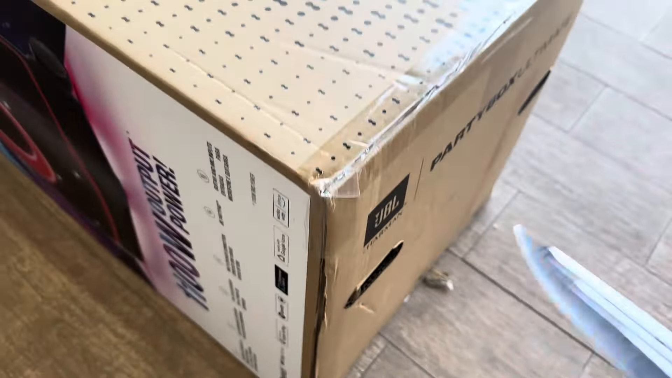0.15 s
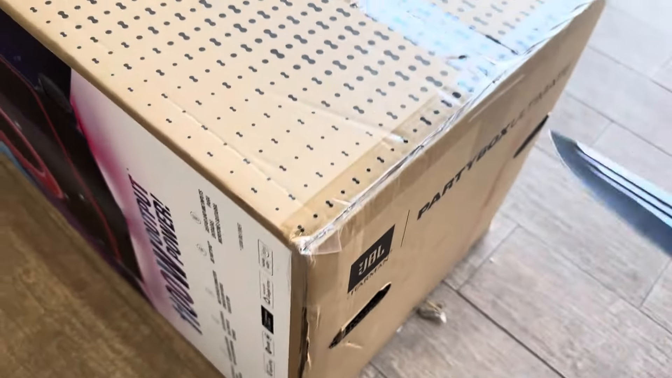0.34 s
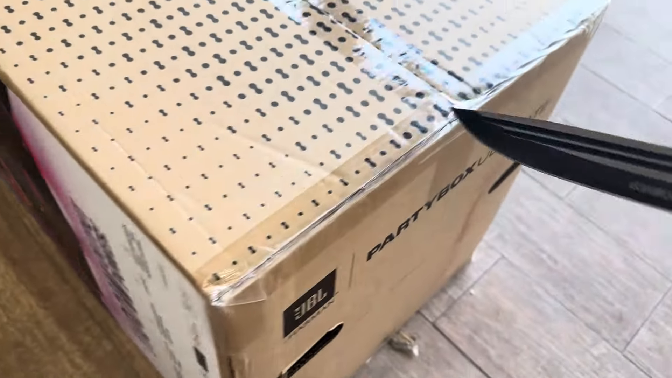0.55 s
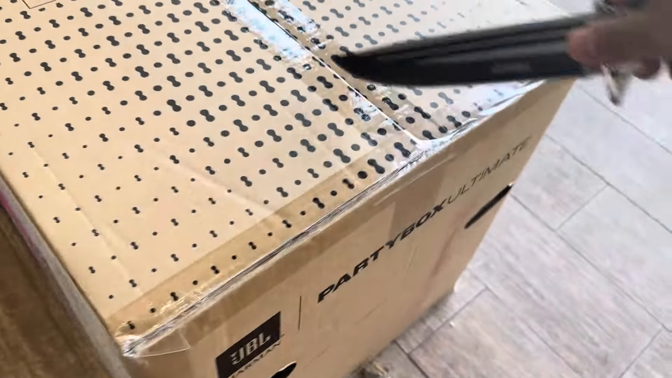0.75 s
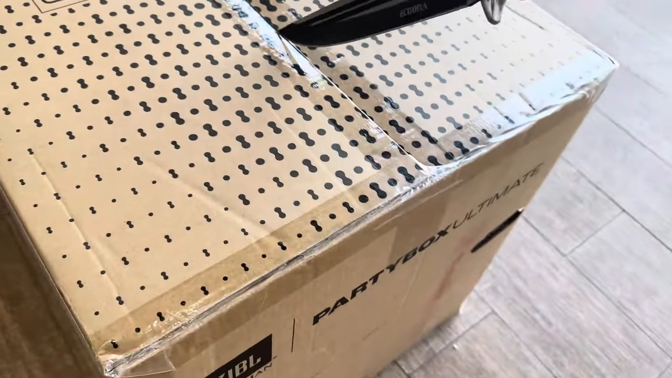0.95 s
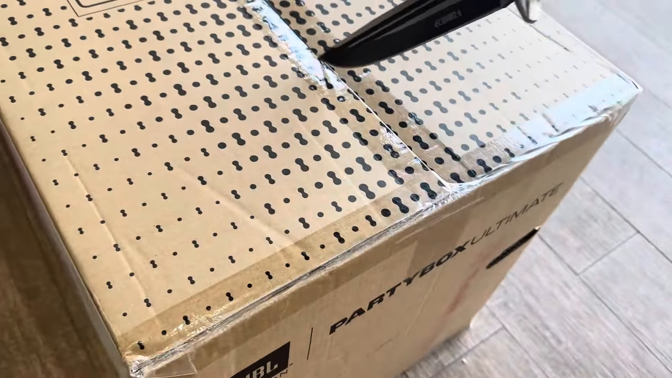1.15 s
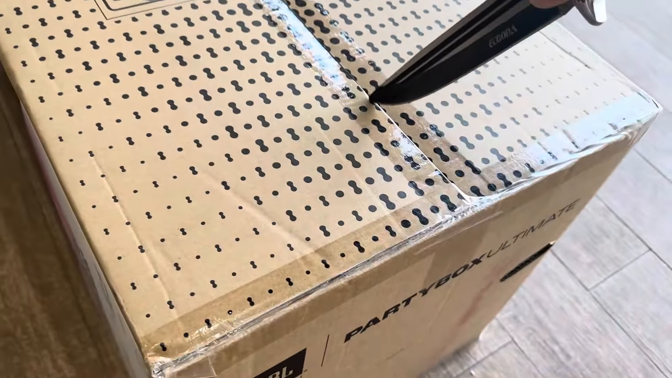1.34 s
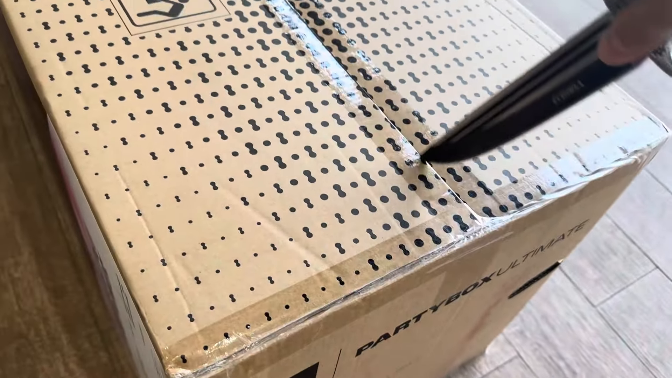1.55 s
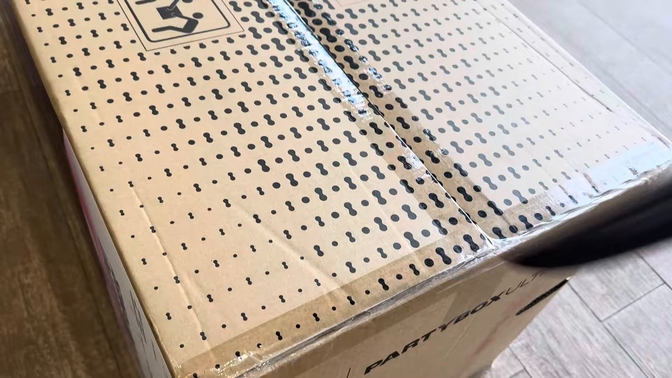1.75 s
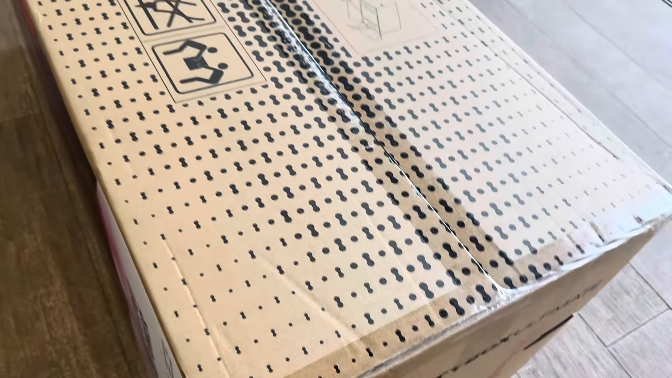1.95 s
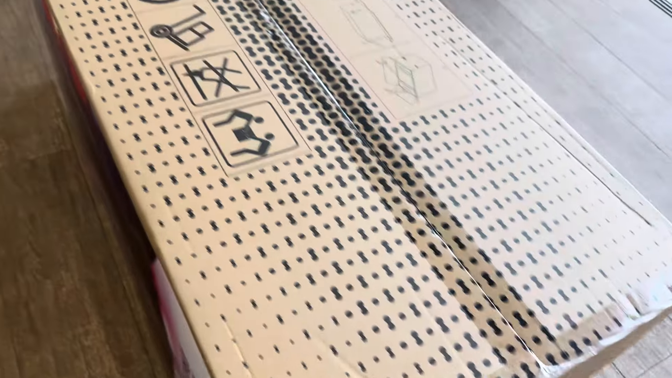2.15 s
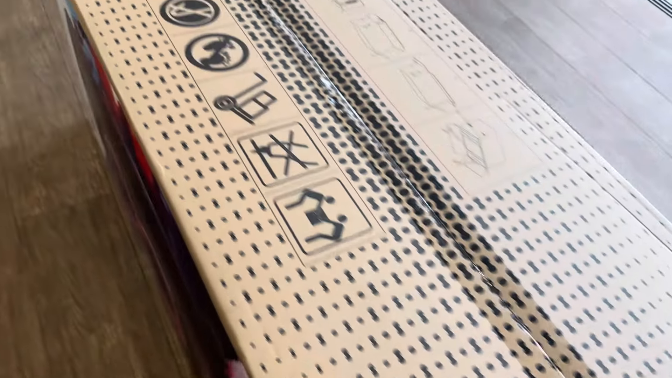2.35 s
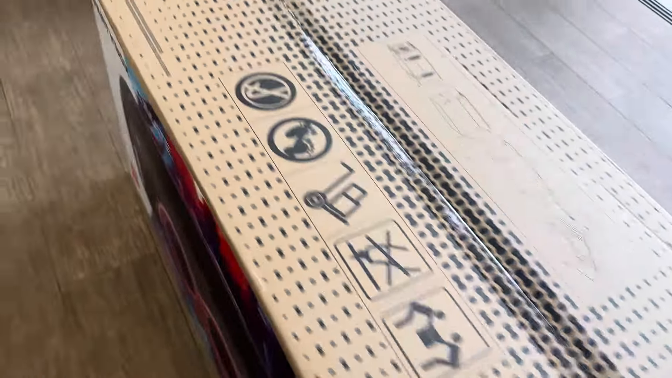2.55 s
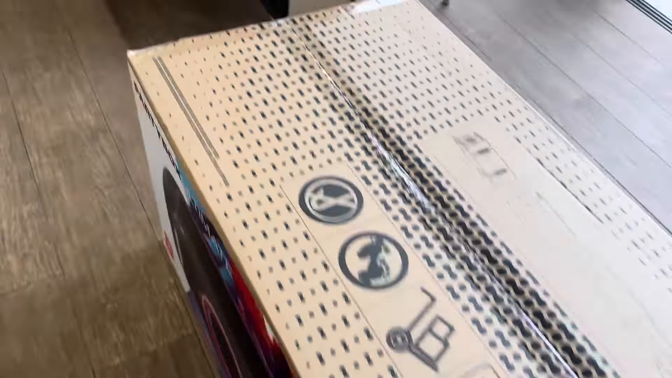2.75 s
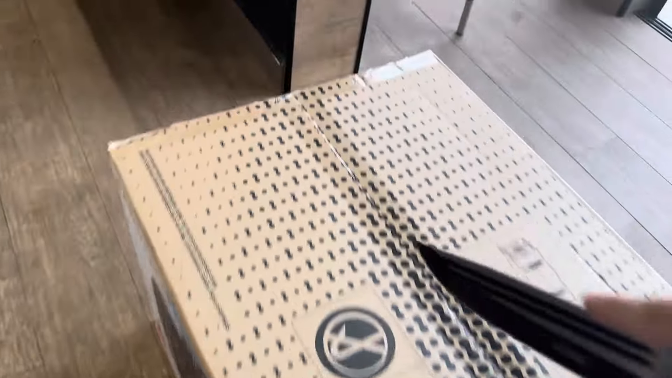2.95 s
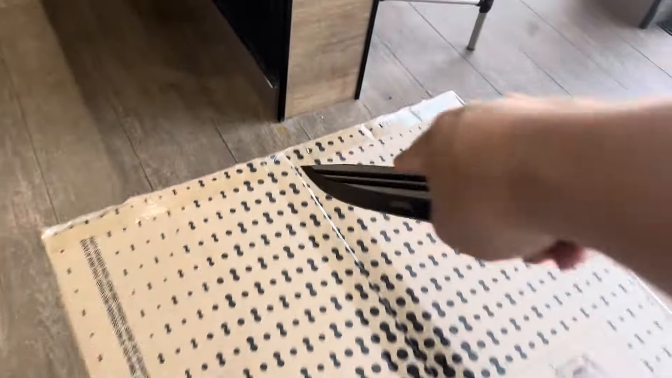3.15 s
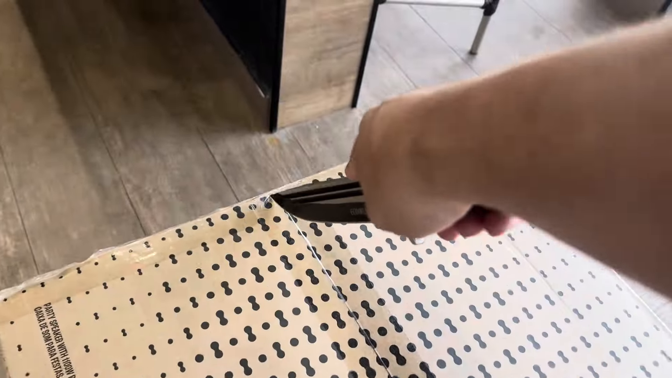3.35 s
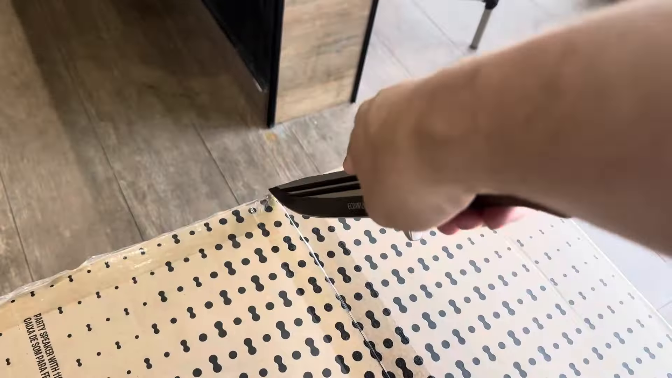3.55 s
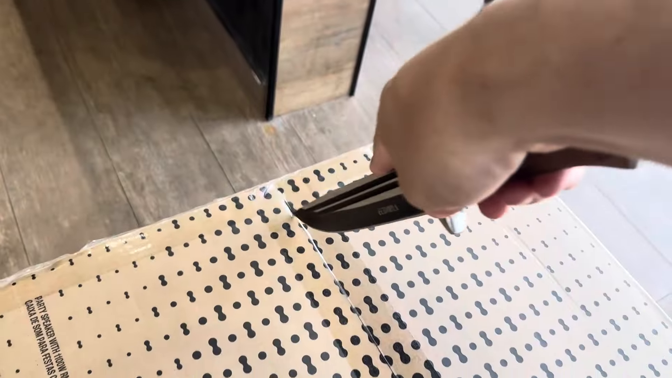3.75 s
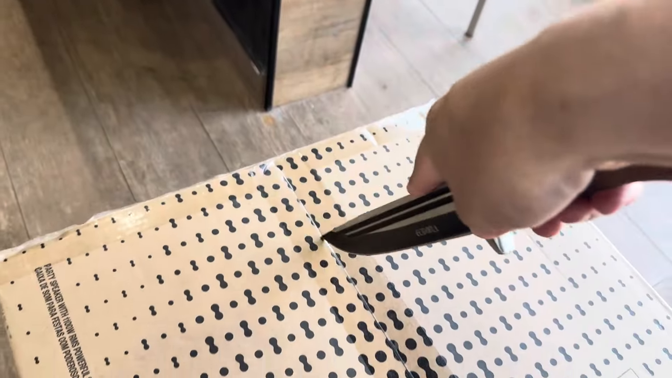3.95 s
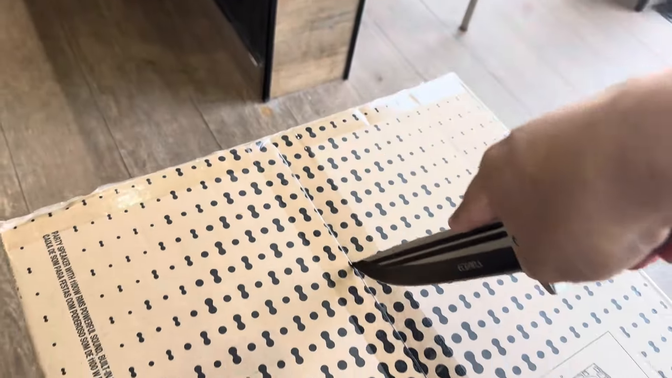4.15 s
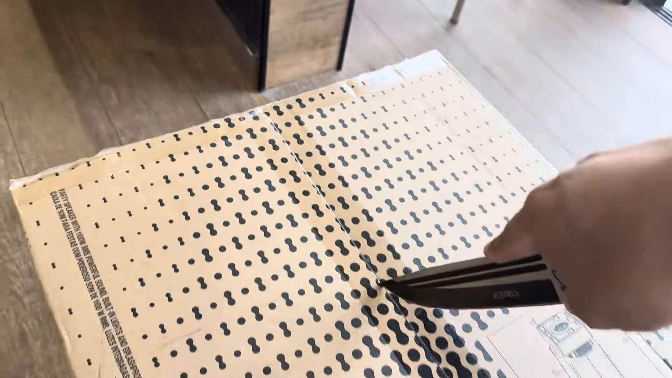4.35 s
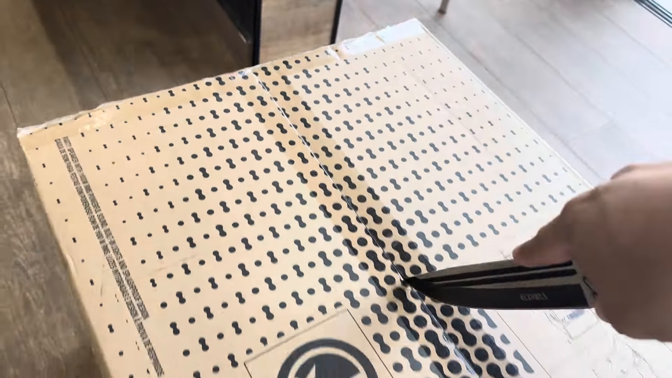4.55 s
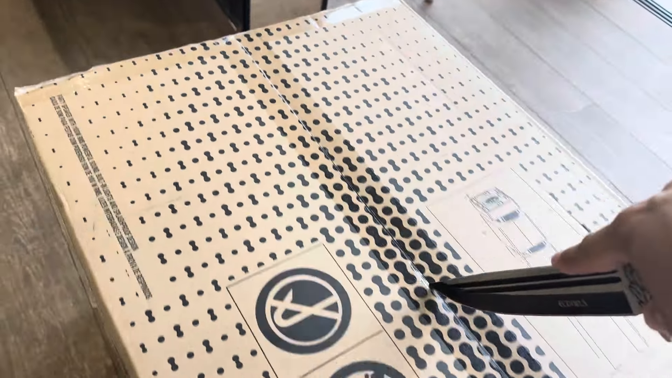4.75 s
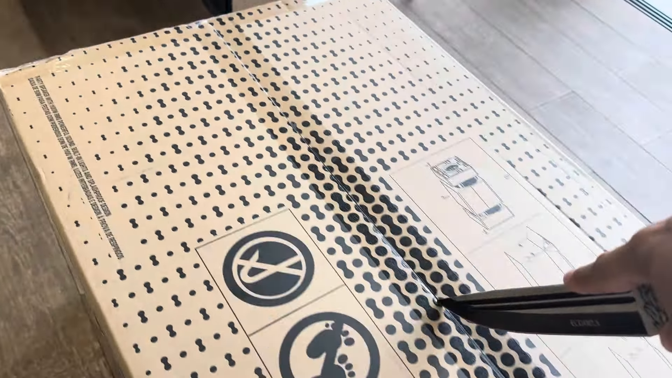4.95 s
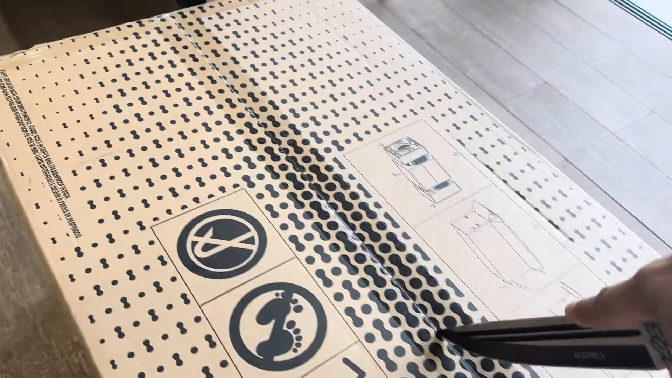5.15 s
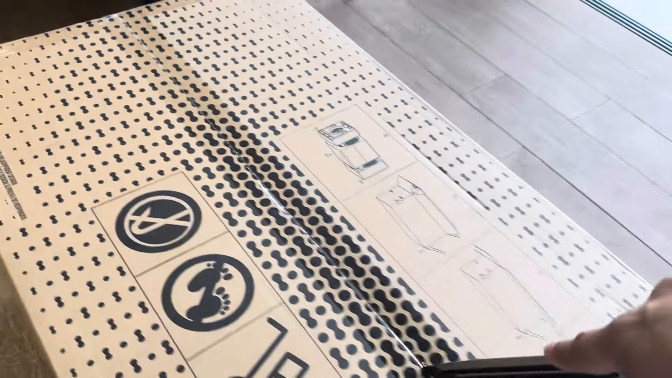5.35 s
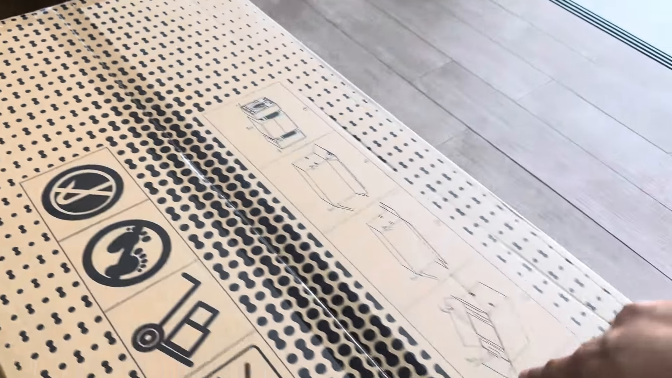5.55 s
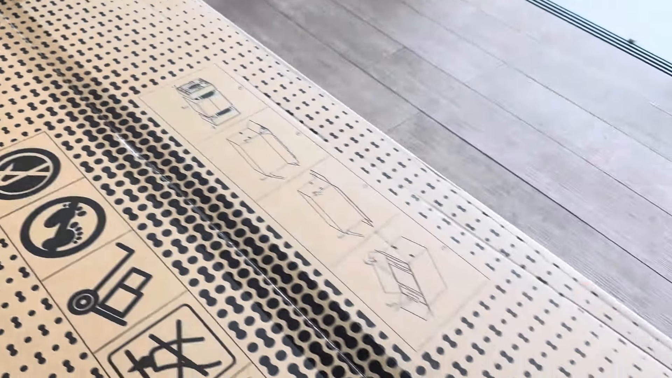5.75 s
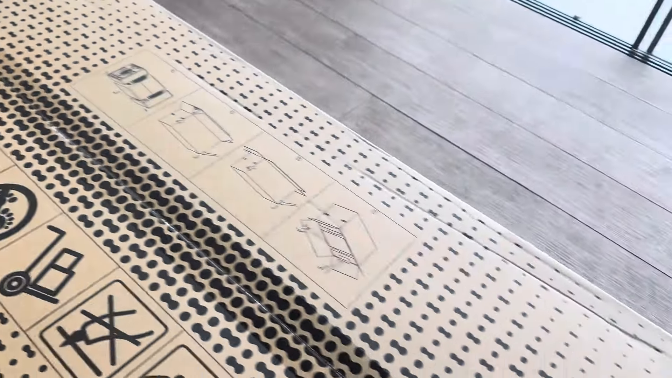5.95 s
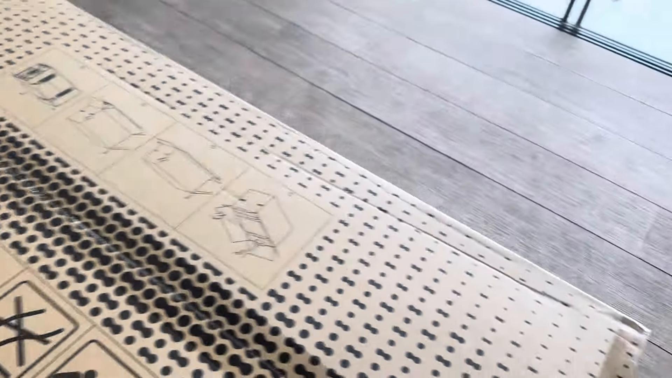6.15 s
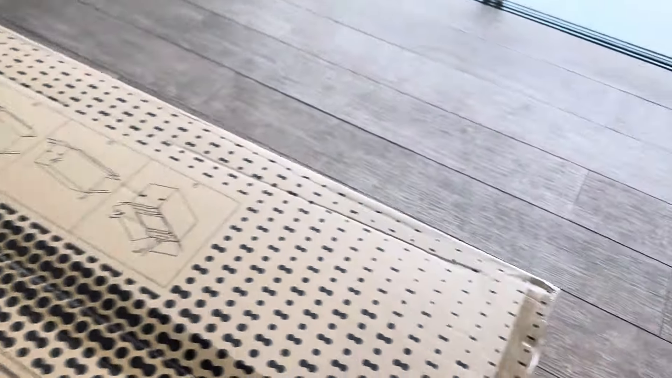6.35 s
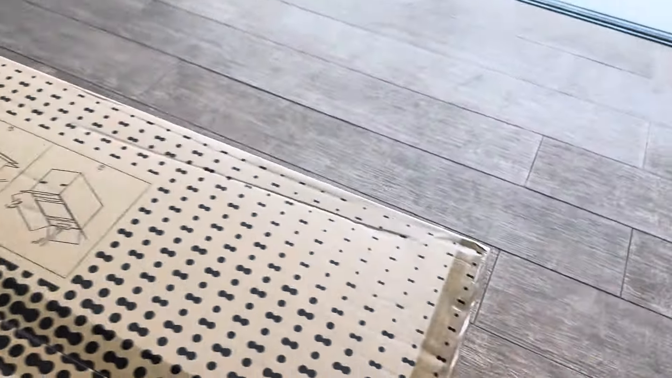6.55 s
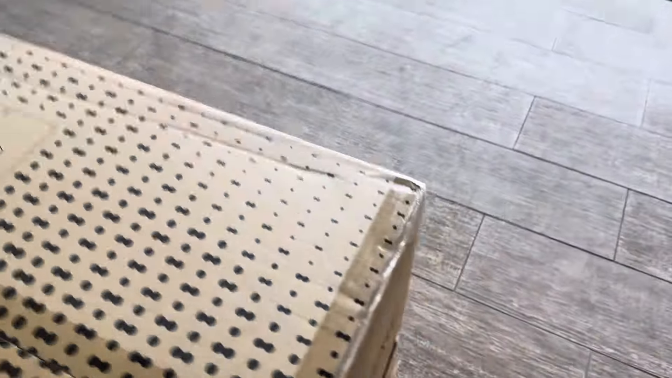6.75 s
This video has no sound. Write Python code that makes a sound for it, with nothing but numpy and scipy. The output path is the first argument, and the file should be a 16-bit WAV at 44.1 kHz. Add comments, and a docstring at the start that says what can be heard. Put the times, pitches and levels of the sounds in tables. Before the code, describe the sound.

A blade punches through packing tape on a big full carton with a sharp snap, then slits the seam in a long rumbling scrape ending in loud thumps.

```python
"""A knife slits the packing tape along the top seam of a large, full carton: a short cut, then a long one.
Fine noise grains hiss as the tape, coarser ones rub as the flaps, and others ring the panel modes as a rumble.
Pushes ring the same modes as thuds; noise bursts snap and tick, sliding tones squeal, a low mode booms.
A room of decaying noise answers the box; a sine hums and coloured noise rustles faintly as air."""
import sys
import numpy as np
from scipy import signal
from scipy.fft import rfft, irfft, next_fast_len
from scipy.io import wavfile
from scipy.ndimage import uniform_filter1d, map_coordinates

SR = 44100
rng = np.random.default_rng(int(sys.argv[2]) if len(sys.argv) > 2 else 0)


def materialize(psi):
    """Save the field psi as 16-bit PCM at rate SR to the path in sys.argv[1].

    A 1-D psi becomes a single channel; in a 2-D psi each row is a channel.
    """
    bounded = np.clip(np.atleast_2d(psi).T, -1, 1)
    quanta = np.round(bounded * 32767).astype(np.int16)
    wavfile.write(sys.argv[1], SR, quanta)


N = 300321


def amp(db):
    """dB to gain."""
    return 10 ** (np.asarray(db) / 20)


def rms_one(x):
    """Scale to rms 1."""
    return x / np.sqrt(np.mean(x ** 2) + 1e-20)


def in_time(rows):
    """Interpolate each column after the first (seconds) to one value per sample."""
    s, *columns = np.transpose(rows)
    return [np.interp(np.arange(N) / SR, s, column) for column in columns]


def at_hz(points, hz):
    """Read a spectrum on a log-frequency axis."""
    points = np.array(points)
    return np.interp(np.log(hz), np.log(points[:, 0]), points[:, 1])


def coloured(x, points):
    """Filter x by a spectrum in dB, rms 1."""
    size = next_fast_len(N)
    hz = np.arange(1, size // 2 + 2) * SR / size
    filtered = irfft(rfft(x, size) * amp(at_hz(points, hz)), size)
    return rms_one(filtered[..., :N])


def drift(rate):
    """Slow smooth wander: random knots of spread 1, two per period of the rate in Hz."""
    knots = rng.standard_normal(int(N / SR * rate * 2) + 3)
    return map_coordinates(knots, [np.arange(N) / SR * rate * 2], order=3)


def grains(per_s, spread_db):
    """Two unrelated streams (mid, side) of tiny slips of uneven size and random sign."""
    sizes = amp(spread_db * np.minimum(rng.exponential(1, (2, N)), 5))
    signs = rng.choice([-1, 1], (2, N))
    return sizes * signs * (rng.random((2, N)) < per_s / SR)


def ring(x, hz, t60_s):
    """Two-pole resonator: a unit click sets a decaying sine ringing."""
    r = amp(-60 / (t60_s * SR))
    w = 2 * np.pi * hz / SR
    return signal.lfilter([0, np.sin(w)], [1, -2 * r * np.cos(w), r * r], x + 1e-18)


def resonate(x, peaks):
    """Sum broad resonances (Hz, width in Hz, dB), each coming and going on its own."""
    out = 0
    for hz, width_hz, db in peaks:
        t60_s = np.log(1000) / (np.pi * width_hz)
        out = out + amp(db + 2.5 * drift(14.0)) * rms_one(ring(x, hz, t60_s))
    return out


def band(x, low_hz, high_hz):
    """Band-pass."""
    return signal.sosfilt(signal.butter(2, [low_hz, high_hz], "band", fs=SR, output="sos"), x)


def near(hz, centre_hz, octaves):
    """Gaussian weight on the octave axis: modes close to the driven pitch answer most."""
    return np.exp(-.5 * (np.log2(hz / centre_hz) / octaves) ** 2)


def swell(t, s, swell_s, hold_s, fade_s):
    """Power of an event: exponential rise until s, hold, then fall; swell_s and fade_s are per 20 dB."""
    before = (s - t) / swell_s
    after = (t - s - hold_s) / fade_s
    return amp(-40 * np.maximum(0, np.maximum(before, after)))


# Spectrum of the air. Each row: frequency in Hz, relative density in dB per Hz.
AIR_SPECTRUM = [(56, -39), (95, -19.5), (108, -9), (306, -1), (477, -16), (832, -14), (1080, -16.5),
                (1180, -15), (1720, -22), (6060, -35), (8000, -39), (10400, -91), (17600, -120)]


def air():
    """Faint moving air: coloured noise, gently patchy."""
    level_db = -52 + .9 * drift(6.0)
    return amp(level_db) * coloured(rng.standard_normal((2, N)), AIR_SPECTRUM)


# Level of the hum over time, nearly gone under the strong boom. Each row: time in seconds, mean rms in dB.
HUM_LEVEL = [(0, -46.5), (.8, -46), (1.2, -44.5), (1.9, -46), (2.6, -42.5), (3.3, -40), (4.05, -37.5),
             (4.2, -50), (4.3, -58), (5.0, -38), (5.9, -43), (6.2, -41.5), (6.81, -44.5)]
HUM_HZ = 58.4


def hum():
    """Low motor hum of an appliance: one steady sine, wandering in level, weaker in the side signal."""
    level_db, = in_time(HUM_LEVEL)
    sine = np.sin(2 * np.pi * HUM_HZ * np.arange(N) / SR)
    return np.sqrt(2) * amp(level_db + 1.1 * drift(3.6)) * sine * [[1], [.5]]


# Decay of the hard-floored room. Each row: frequency in Hz, T60 in seconds, relative level in dB.
ROOM_DECAY = [(101, 0.54, -0.5), (398, 0.5, 0.5), (1467, 0.83, -1.5), (5330, 0.59, -1),
              (11860, 0.091, -22.5)]


def room(x):
    """Diffuse tail: octaves of noise, each dying at its own rate, convolved with the mid signal."""
    t = np.arange(int(.8 * SR)) / SR
    decay = np.array(ROOM_DECAY)
    onset = np.clip(t / 0.0015, 0, 1)
    tail = np.zeros((2, len(t)))
    for hz in 60 * 2. ** np.arange(8):
        centre_hz = np.sqrt(2) * hz
        t60_s = at_hz(decay[:, [0, 1]], centre_hz)
        level_db = at_hz(decay[:, [0, 2]], centre_hz)
        noise = band(rng.standard_normal((2, len(t))), hz, 2 * hz)
        tail += amp(level_db - 60 * t / t60_s) * noise * onset
    tail /= np.sqrt(np.sum(tail[0] ** 2))
    return signal.fftconvolve(x[:1], tail, axes=1)[:, :N]


# Booms where the blade judders. Each row: time when full level is reached in seconds, hold in seconds,
# mean pitch in Hz, level in dB.
JUDDER_BOOMS = [(4.39, 0.11, 58.5, -29), (4.62, 0.061, 60.63, -39), (4.947, 0.032, 60.87, -38),
                (5.193, 0.02, 64.87, -37), (5.395, 0.041, 62.04, -55), (5.744, .02, 60.7, -35)]
BOOM_SWELL_S, BOOM_FADE_S = 0.15, 0.28   # per 20 dB


def boom():
    """The box in its lowest mode: an oscillation uneven in pitch and level, peaked by its octave."""
    t = np.arange(N) / SR
    s, hold_s, hz, _ = np.transpose(JUDDER_BOOMS)
    power = 0
    for full_s, held_s, _, db in JUDDER_BOOMS:
        power = power + amp(2 * db) * swell(t, full_s, BOOM_SWELL_S, held_s, BOOM_FADE_S)
    pitch_hz = np.interp(t, s + hold_s / 2, hz) * (1 + 0.0203 * drift(7.7))
    phase = 2 * np.pi * np.cumsum(pitch_hz) / SR
    wave = np.cos(phase) + 0.088 * np.cos(2 * phase)
    return np.sqrt(2 * power) * amp(0.44 * drift(36.0)) * wave * [[1], [.5]]


# Modes of the carton's panels and air. Each row: pitch in Hz, relative level in dB,
# T60 in seconds before the shortening in thuds() and rumble().
CARTON_MODES = [(64.4, -4, 0.12), (79.3, -8, 0.07), (90, -6.5, .06), (103, -1.5, 0.09), (117, -5.5, 0.042),
                (150.5, 0, 0.065), (180, -1.5, 0.057), (219, -4.5, 0.042), (253.4, -0.5, 0.064),
                (296, -1.5, 0.08), (349.5, -1, 0.064), (393, -5, 0.0914), (453, -16.5, 0.0755),
                (481.4, -3, 0.11), (567, -18.5, 0.034), (622, 1, 0.074), (806, -11, 0.017)]
# Blows on the carton. Each row: start in seconds, thud peak in dB, thud pitch in Hz, reach over the modes
# in octaves, knock level in dB, after-rumble in dB, flap rattle in dB before the drag trim in rub().
BLOWS = [(0.855, -24, 120, .9, -34, -29, -45.5), (0.886, -26, 71, 0.73, -51, -47, -64),
         (1.253, -12.5, 262, 1.4, -23, -25, -27.5), (1.7, -11, 93.4, 0.46, -35, -27.5, -49),
         (1.74, -31, 85, 0.67, -54.5, -39, -57), (1.773, -34, 95, 0.65, -55, -44, -55),
         (1.811, -32, 75, .74, -61, -47, -62), (2.945, -49, 201, 0.93, -41, -47, -44),
         (3.324, -42, 299, 0.68, -45, -42.5, -45), (3.707, -29.5, 220, 0.89, -48, -46.5, -40),
         (3.728, -26.5, 290, 0.089, -58, -51.5, -60), (3.78, -21, 305, 0.18, -60, -47.5, -64),
         (3.846, -34, 290, 0.12, -58, -53, -60), (3.893, -30, 287, .1, -62, -50, -60),
         (3.934, -31, 292, 0.066, -50, -46, -60), (3.999, -28, 150, 0.098, -51, -51, -58),
         (4.103, -29, 152, 0.17, -57, -47, -47), (4.195, -29, 140, 0.2, -56, -46, -54),
         (4.279, -24.5, 128, 0.57, -49, -44, -57), (4.394, -31, 110, 0.74, -60, -31, -42),
         (4.489, -26, 145, 0.35, -59, -42, -57), (4.53, -36, 102, 0.51, -47, -47.5, -42.5),
         (4.585, -19, 140, 0.51, -54, -44, -60), (4.633, -34, 100, 0.71, -44, -30, -56),
         (4.678, -16.5, 151, 0.21, -53, -30, -60), (5.006, -27, 298, .2, -46, -55, -58),
         (5.103, -27, 105, 0.37, -50, -48, -55), (5.182, -24, 300, 0.33, -46, -42, -57),
         (5.282, -23, 130, 0.61, -40, -48, -52), (5.398, -26, 385, 0.084, -38, -46, -56),
         (5.457, -25, 129, 0.66, -36, -50, -59), (5.591, -28, 255, 0.13, -38, -42, -48),
         (5.749, -18, 220, 0.65, -48, -41, -48), (5.819, -21, 296, 0.094, -46, -29.5, -40),
         (5.868, -11, 282, 0.32, -40, -25, -23), (5.955, -22, 295, 0.23, -42, -35, -35),
         (5.979, -9, 167.4, 0.34, -36, -41.5, -48)]
CONTACT_CYCLES = 0.4   # length of the push, in cycles of the thud pitch


def thuds():
    """A soft push rings the carton modes near its pitch; a dull burst of noise is the knock."""
    out = np.zeros((2, N))
    strengths = amp(3.0 * rng.standard_normal((len(BLOWS), 2, len(CARTON_MODES))))
    t = np.arange(int(.3 * SR)) / SR
    knock_shape = np.clip(t / 0.0011, 0, 1) * amp(-60 * t / 0.018)
    for (s, thud_db, thud_hz, reach, knock_db, *_), strength in zip(BLOWS, strengths):
        body = 0
        for k, (hz, db, t60_s) in enumerate(CARTON_MODES):
            delay_s = 0.043 / np.sqrt(hz)   # bending waves: the lows travel slower and come later
            progress = (t - delay_s) * thud_hz / CONTACT_CYCLES
            push = np.sin(np.pi * np.clip(progress, 0, 1)) ** 2
            gain = amp(db) * near(hz, thud_hz, reach) * strength[:, [k]]
            body = body + gain * ring(push, hz, 0.72 * t60_s)
        body = body / np.abs(body).max(axis=1, keepdims=True)
        noise = rng.standard_normal((2, len(t)))
        knock = rms_one(band(band(noise, 350, 1800), 350, 1800)) * knock_shape
        at = round(s * SR)
        out[:, at:at + len(t)] += amp(thud_db) * body + amp(knock_db) * knock
    return out


# Snaps of tape and ticks of the blade. Each row: start in seconds, crack peak in dB, crack pitch in Hz,
# edge peak in dB, bright snap peak in dB.
SNAPS = [(0.1694, -58, 915, -54, -73), (0.1999, -41.5, 1130, -48.5, -81), (0.5734, -62, 1230, -56, -55),
         (0.8555, -43, 700, -42, -42), (1.073, -57, 1060, -49, -65.5), (1.119, -62, 1180, -74, -52.5),
         (1.253, -14, 2110, -20, -8.5), (1.2535, -19, 806, -36, -25), (1.279, -36, 2000, -36, -50),
         (1.638, -40, 895, -41, -32), (1.6425, -26, 2050, -33, -38), (1.687, -31, 1250, -36, -39),
         (1.6925, -22, 1330, -21, -25), (1.696, -21, 1650, -37, -37), (1.9297, -47, 1660, -53, -51),
         (2.029, -56, 937, -52, -59), (2.2364, -35.5, 1240, -37.5, -29), (2.9436, -36.5, 1100, -43, -70),
         (2.959, -34.5, 1380, -54, -72), (2.9794, -38.5, 890, -65, -69.5), (3.3253, -33.5, 1000, -49, -67),
         (3.694, -47, 940, -54, -50.5), (3.707, -35, 2420, -51, -37), (4.576, -33, 1020, -39, -45.5),
         (5.814, -38, 1622, -52, -39), (5.87, -21, 1240, -33, -22), (5.898, -26, 1650, -30, -30),
         (5.929, -24, 1300, -33, -30), (5.9542, -20, 1520, -27, -17), (5.9648, -16, 1520, -21, -27),
         (6.5467, -34, 1560, -45.5, -59)]
EDGE_BAND_HZ = (2300, 5700)


def ticks():
    """Milliseconds of bright noise, a sharp edge below it and a longer crack ringing at its own pitch."""
    out = np.zeros((2, N))
    t = np.arange(int(.03 * SR)) / SR
    for s, crack_db, crack_hz, edge_db, snap_db in SNAPS:
        noise = rng.standard_normal((3, 2, len(t)))
        snap = band(noise[0] * (1 - np.exp(-t / .0003)) * amp(-60 * t / .0035), 9600, 12500)
        edge = band(band(noise[1] * amp(-60 * t / .008), *EDGE_BAND_HZ), *EDGE_BAND_HZ)
        crack = ring(noise[2] * amp(-60 * t / .0015), crack_hz, 7 / crack_hz)
        crack = band(crack, crack_hz / 3, crack_hz * 2)
        at = round(s * SR)
        for level_db, part in ((snap_db, snap), (edge_db, edge), (crack_db, crack)):
            out[:, at:at + len(t)] += amp(level_db) * part / np.abs(part).max(axis=1, keepdims=True)
    return out


# Squeals of the stretched tape. Each row: time when full level is reached in seconds, hold in seconds,
# first pitch in Hz, last pitch in Hz, width in Hz, level in dB.
TAPE_SQUEALS = [(1.622, 0.008, 3400, 3580, 500, -47), (1.64, .006, 4000, 3900, 600, -48),
                (1.66, 0.021, 2900, 3270, 700, -50), (1.69, 0.0087, 4500, 4170, 900, -42),
                (5.871, 0.043, 3552, 3590, 800, -32), (5.876, 0.032, 1304, 1586, 500, -33.5),
                (5.922, 0.05, 1550, 1516, 352, -37.5), (5.947, 0.0256, 3060, 2720, 400, -37),
                (6.332, 0.0243, 1990, 2680, 700, -48.5)]
SQUEAL_SWELL_S, SQUEAL_FADE_S = 0.005, 0.03   # per 20 dB


def squeals():
    """A rough tone: slips of the film, smoothed to the width of the squeal, shake a sliding pitch."""
    t = np.arange(N) / SR
    slips = grains(8000, spread_db=-0.5)
    out = 0
    for s, hold_s, first_hz, last_hz, width_hz, db in TAPE_SQUEALS:
        r = np.exp(-np.pi * width_hz / SR)
        shake = rms_one(signal.lfilter([1], [1, -2 * r, r * r], slips))
        pitch_hz = np.interp(t, [s, s + hold_s], [first_hz, last_hz])
        tone = np.cos(2 * np.pi * np.cumsum(pitch_hz) / SR)
        envelope = np.sqrt(2 * swell(t, s, SQUEAL_SWELL_S, hold_s, SQUEAL_FADE_S))
        out = out + amp(db) * envelope * shake * tone
    return out


def rumble(level_db, panel_hz):
    """Friction shakes the panel modes above the lowest; which ones depends on where the blade is."""
    out, power = 0, 1e-9
    for hz, db, t60_s in CARTON_MODES[1:]:
        weight = amp(db) * near(hz, panel_hz, octaves=0.64)
        shaken = rms_one(ring(grains(1200, spread_db=2.5), hz, 0.77 * t60_s))
        out = out + weight * amp(2.0 * drift(15.0)) * shaken
        power = power + weight ** 2
    return amp(level_db + 0.52 * drift(25.0)) * out / np.sqrt(power)


# Spectrum of the rub. Each row: frequency in Hz, relative density in dB per Hz.
RUB_SPECTRUM = [(180, -35.5), (300, -5.5), (850, -16), (944, -10.5), (1480, -13), (2110, -11),
                (3570, -21.5), (7000, -15), (9100, -30), (15400, -120)]
# Rings of the dragged flaps, then colours of thick and of thin fibres tearing.
# Each row: centre in Hz, width in Hz, relative level in dB.
FLAP_RINGS = [(503, 79, 1.5), (722, 90, -1.5), (833, 55, -0.5), (1230, 166, -3)]
THICK_FIBRES = [(1500, 250, 2), (1850, 250, 0), (2400, 350, -1)]
THIN_FIBRES = [(3150, 350, -1), (3750, 700, 0), (4400, 500, -4)]
CATCHES_PER_S, CATCH_DB, CATCH_FALL_S = 28, -8, 0.022   # edge catching on fibres; fall per 20 dB


def rub(drag_db, coarse_db, fine_db):
    """The flaps drag along the blade in dense grains: dull below, two coloured rasps of fibre above."""
    slips = coloured(grains(3000, spread_db=1.5), RUB_SPECTRUM)
    drag = rms_one(rms_one(band(slips, 232, 1030)) + amp(-7.0) * resonate(slips, FLAP_RINGS))
    coarse = rms_one(rms_one(band(slips, 1200, 2800)) + resonate(slips, THICK_FIBRES))
    fine = rms_one(rms_one(band(slips, 2300, 6000)) + resonate(slips, THIN_FIBRES))
    hits = np.abs(grains(CATCHES_PER_S, spread_db=2.5)[0])
    decay = amp(-20 / (CATCH_FALL_S * SR))
    catches = 1 + amp(CATCH_DB) * signal.lfilter([1], [1, -decay], hits)
    dragged = amp(drag_db - 2.5 + 2.5 * drift(35.0)) * drag
    rasped = amp(0.42 * drift(60.0) - 3.0) * (amp(coarse_db) * coarse + amp(fine_db) * fine)
    return catches * (dragged + rasped)


# Spectrum of the hiss. Each row: frequency in Hz, relative density in dB per Hz.
HISS_SPECTRUM = [(2000, -32.5), (4000, -14), (6000, -8.5), (8000, -16.5), (11000, 18.5), (13300, -1),
                 (15000, 9.5), (16000, -2.5)]
# Broad bright peaks of the hiss. Each row: centre in Hz, width in Hz, relative level in dB.
HISS_PEAKS = [(4060, 170, -16.5), (6300, 355, -9), (7795, 340, 3.5), (10140, 890, -2)]


def tape(level_db):
    """The film parts in very fine rips, lifted a little at a few broad peaks."""
    rips = coloured(grains(6000, spread_db=-1.5), HISS_SPECTRUM)
    flutter_db = 1.3 * drift(45.0)
    return amp(level_db + flutter_db) * rms_one(rips + amp(-9.0) * resonate(rips, HISS_PEAKS))


# The two cuts along the seam. Each row: time in seconds, panel rumble in dB, pitch of the panel under the
# blade in Hz, flap drag in dB before the trim in rub(), tape hiss in dB.
SEAM_CUTS = [
    [(1.26, -44.5, 158.3, -41, -55), (1.37, -45.5, 180, -54, -59), (1.45, -39.5, 255, -41.5, -51.5),
     (1.58, -44.5, 218, -43.5, -53), (1.65, -40, 196.5, -38, -50), (1.7, -34, 160, -41, -38)],
    [(3.7, -47.5, 188, -57, -74), (3.77, -42, 261, -65, -56), (3.88, -47.5, 257, -64, -58),
     (3.97, -40, 237, -50, -57), (4.03, -42, 149, -50, -54), (4.19, -42.5, 159, -52, -54.5),
     (4.28, -38, 141, -45.5, -52.5), (4.45, -38, 134, -45.5, -53.5), (4.63, -32.5, 146, -45, -48.5),
     (4.71, -32.5, 151, -52.5, -50.5), (4.84, -40.5, 154, -53.5, -54), (5.08, -38.5, 205, -52, -51.5),
     (5.33, -37.5, 228, -48, -47.5), (5.41, -37.5, 258, -49.5, -48.5), (5.53, -39.5, 213, -46, -50),
     (5.62, -32, 255, -45.5, -47.5), (5.67, -30.5, 214, -50.5, -46), (5.73, -29, 171, -46, -43.5),
     (5.83, -33, 243, -39, -44.5), (5.9, -37, 258, -27, -33.5), (5.98, -24, 275, -40, -43)],
]
# Brushes and rips. Each row: time when full level is reached, swell per 20 dB, hold and fade per 20 dB
# in seconds, fine and coarse rasp in dB before the trim in rub(), hiss in dB.
BRUSHES = [(0.0, .01, .005, 0.24, -53, -51.5, -73), (0.203, 0.02, .005, 0.054, -60, -59, -74.5),
           (0.8, 0.13, 0.071, 0.13, -49, -51, -65), (1.228, 0.0814, .03, .02, -60, -74, -61.5),
           (1.251, .0015, 0.037, 0.081, -34.5, -42.5, -42), (1.327, .05, .03, 0.17, -43, -50, -53.5),
           (1.48, .2, 0.11, .2, -54, -56, -63.5), (1.647, 0.081, 0.028, .03, -49, -41, -52),
           (1.686, 0.013, 0.0091, 0.044, -35, -37, -35), (1.73, .03, .015, 0.22, -46, -50.5, -76.5),
           (2.232, 0.0033, 0.021, 0.13, -66, -59, -64), (2.45, 0.34, 0.0083, 0.54, -63.5, -62, -76),
           (2.949, .004, 0.015, 0.11, -59, -63, -72), (3.122, 0.39, 0.038, 0.17, -57, -59.5, -76),
           (3.323, 0.0035, 0.047, 0.11, -58, -71, -69), (3.58, 0.093, 0.14, 0.12, -75, -86, -69),
           (3.694, .004, 0.021, 0.053, -49, -71, -55), (4.1, 0.48, 0.15, 0.18, -52, -58.5, -67.5),
           (5.815, 0.018, 0.05, .02, -60, -42, -45), (5.865, .004, 0.022, .1, -35, -35, -44),
           (5.922, 0.027, .008, 0.056, -34, -42, -34), (5.952, 0.07, 0.027, 0.042, -28, -33, -36),
           (6.02, .03, 0.014, 0.22, -38, -47, -56), (6.168, 0.07, 0.02, 0.15, -43, -51, -55.5),
           (6.339, 0.072, 0.024, 0.25, -47, -57, -64.5), (6.8, 0.58, .01, 0.089, -55.5, -63.5, -85.5)]
# Fall per 20 dB after a cut, in seconds: rumble, drag, coarse rasp, fine rasp, hiss.
LET_GO_FALL_S = (0.084, 0.15, .05, .05, 0.0096)
# The same five layers under idle hands, in dB, with their wander.
REST_DB, REST_WANDER_DB, REST_HZ = (-55.5, -63, -86.5, -86, -85.5), 2.5, 126
FINE_DB, COARSE_DB = -50.5, -57.5   # rasp in a cut when the hiss is at the reference level, before offset and trim
RASP_FOLLOWS, REFERENCE_HISS_DB = 0.63, -43   # the rasp's share of the swing of the hiss in dB
RASP_BY_CUT_DB = (1, 1.5)   # rasp offset of the short and of the long cut
SETTLE_S = 0.14   # return of the panel pitch to rest
SHAKE_FALL_S, RATTLE_FALL_S = 0.044, 0.029   # per 20 dB, after a blow


def hands():
    """Five layer levels in dB (rumble to hiss) and panel pitch: powers of rest, cuts, rasps and blows add."""
    t = np.arange(0, N / SR + .001, .001)
    # every 44th sample: about 1 ms
    rest = [amp(2 * (db + REST_WANDER_DB * drift(5.5)[::44][:len(t)])) for db in REST_DB]
    power = np.array(rest)
    panel_hz = np.full(len(t), float(REST_HZ))
    for cut, offset_db in zip(SEAM_CUTS, RASP_BY_CUT_DB):
        s, *columns = np.transpose(cut)
        rumble_db, hz, drag_db, hiss_db = (np.interp(t, s, column) for column in columns)
        rasp_db = offset_db + RASP_FOLLOWS * (hiss_db - REFERENCE_HISS_DB)
        panel_hz += (hz - REST_HZ) * (t > s[0]) * np.clip(1 - (t - s[-1]) / SETTLE_S, 0, 1)
        layers_db = (rumble_db, drag_db, COARSE_DB + rasp_db, FINE_DB + rasp_db, hiss_db)
        for k, db in enumerate(layers_db):
            power[k] += amp(2 * db) * swell(t, s[0], 0.0036, s[-1] - s[0], LET_GO_FALL_S[k])
    for s, swell_s, hold_s, fade_s, fine_db, coarse_db, hiss_db in BRUSHES:
        levels_db = np.array([[coarse_db], [fine_db], [hiss_db]])
        power[2:] += amp(2 * levels_db) * swell(t, s, swell_s, hold_s, fade_s)
    for s, *_, shake_db, rattle_db in BLOWS:
        power[0] += amp(2 * shake_db) * swell(t, s + 0.005, 0.0013, 0.0034, SHAKE_FALL_S)
        power[1] += amp(2 * rattle_db) * swell(t, s + 0.0018, 0.0028, 0.0049, RATTLE_FALL_S)
    layers_db = 10 * np.log10(power)
    return in_time(np.column_stack([t, *layers_db, uniform_filter1d(panel_hz, size=15)]))


def scene():
    """All sources as a mid and a side signal."""
    rumble_db, drag_db, coarse_db, fine_db, hiss_db, panel_hz = hands()
    strokes = rumble(rumble_db, panel_hz) + rub(drag_db, coarse_db, fine_db) + tape(hiss_db) + squeals()
    blows = thuds() + ticks()
    reverb = room(amp(-10.0) * strokes + amp(-8.5) * blows)
    return strokes + blows + boom() + reverb + air() + hum()


# Stereo image. Each row: frequency in Hz, left-right likeness (clipped to -0.95..0.99 in use).
STEREO_LIKENESS = [(60, 0.97), (120, 0.87), (240, 0.91), (480, 0.1), (950, -0.053), (1890, -0.18),
                   (3770, 0.11), (7520, -0.2), (15000, 0.59)]
# Each row: frequency in Hz, left over right in dB.
STEREO_LEAN = [(60, 0), (120, -1.5), (240, -0.5), (480, -4), (950, -5), (1890, -2), (3770, -2),
               (7520, -3.5), (15000, 2)]
# Part of the side signal that is the mid turned to trail on the left. Each row: frequency in Hz, share 0-1.
LATE_LEFT_SHARE = [(100, 0.9), (300, 1), (1000, 0.58), (4000, 0), (10000, 0.1)]
LOW_CUT_HZ, HIGH_CUT_HZ = 44, 16500


def record(dry):
    """A widened stereo image: alike in the bass, apart above, the right mostly louder; both ends are cut."""
    size = next_fast_len(N + SR // 10)
    hz = np.arange(1, size // 2 + 2) * SR / size
    alike = np.clip(at_hz(STEREO_LIKENESS, hz), -.95, .99)
    mid, side = rfft(dry, size)
    late = np.clip(at_hz(LATE_LEFT_SHARE, hz), 0, 1)
    # a quarter turn of phase: left trails, right leads
    side = -1j * late * mid + np.sqrt(1 - late ** 2) * side
    side = side * np.sqrt((1 - alike) / (1 + alike))
    lean = amp(at_hz(STEREO_LEAN, hz) / 2)
    pair = irfft(np.array([(mid + side) * lean, (mid - side) / lean]), size)[:, :N]
    pair = signal.sosfilt(signal.butter(5, LOW_CUT_HZ, "high", fs=SR, output="sos"), pair)
    return signal.sosfilt(signal.cheby2(24, 70, HIGH_CUT_HZ, fs=SR, output="sos"), pair)


dry = scene()
out = record(dry)
materialize(out)
```